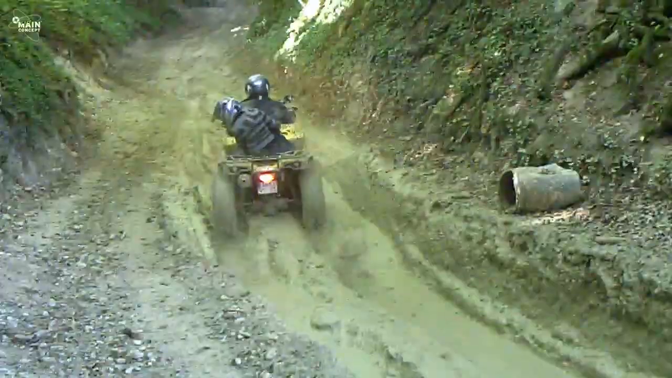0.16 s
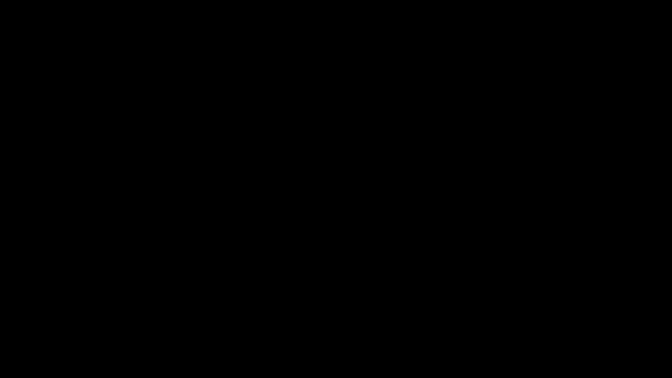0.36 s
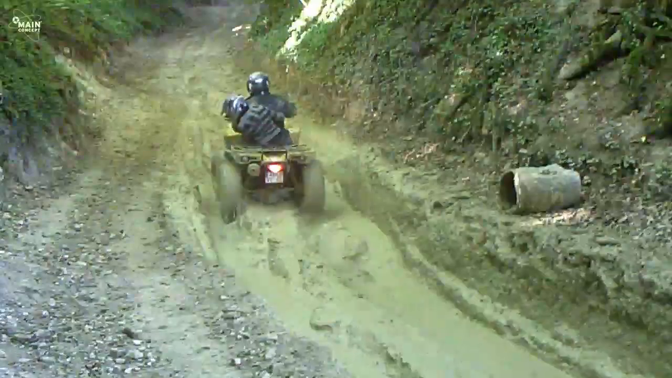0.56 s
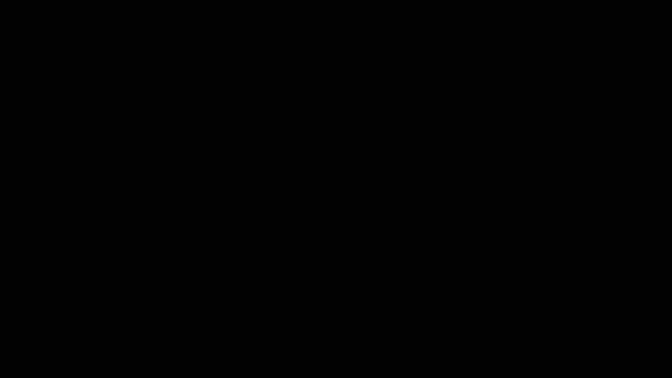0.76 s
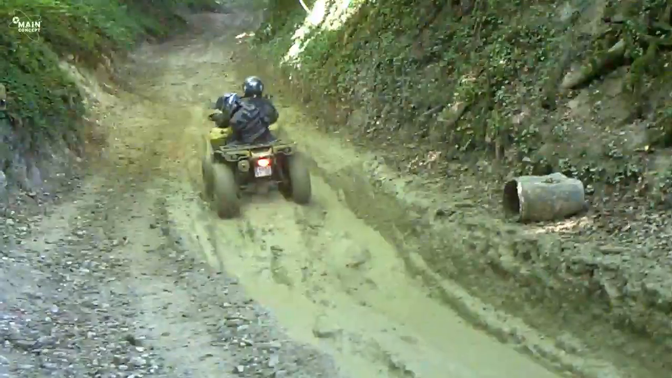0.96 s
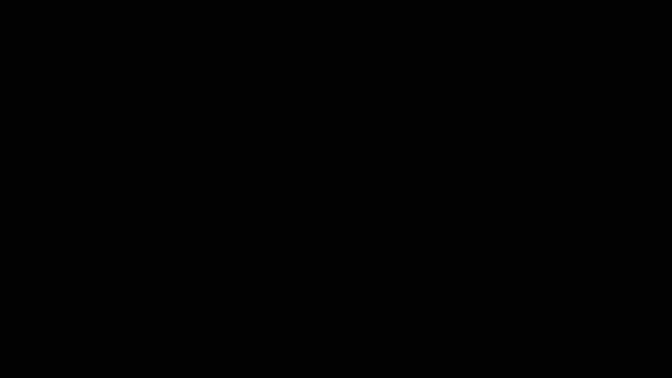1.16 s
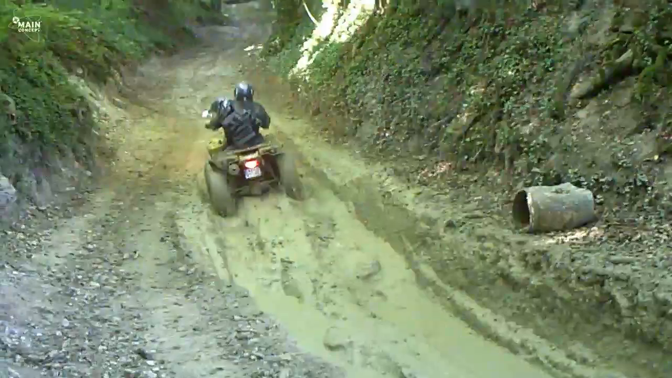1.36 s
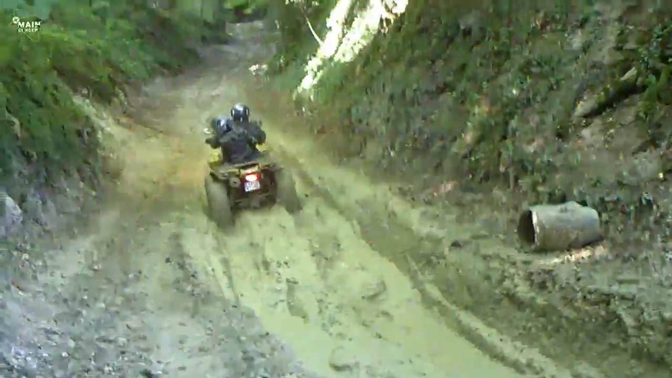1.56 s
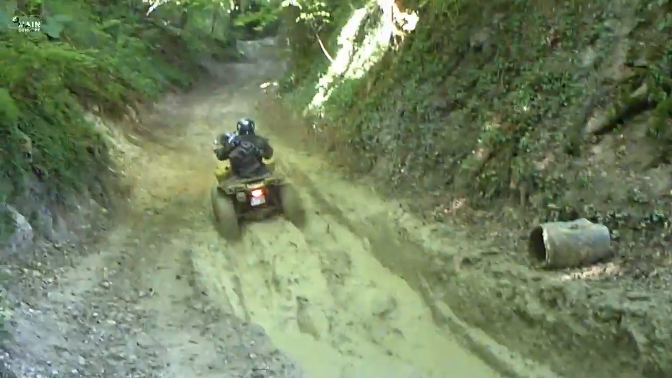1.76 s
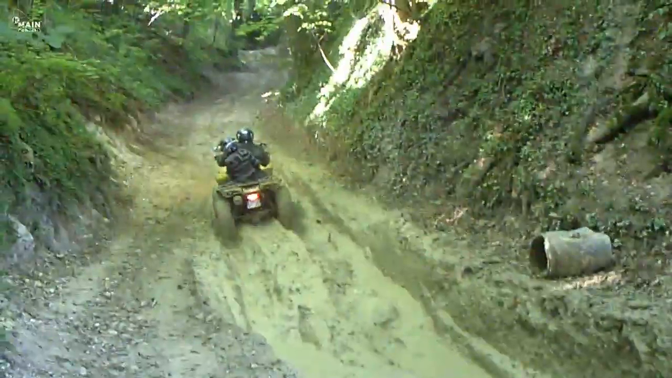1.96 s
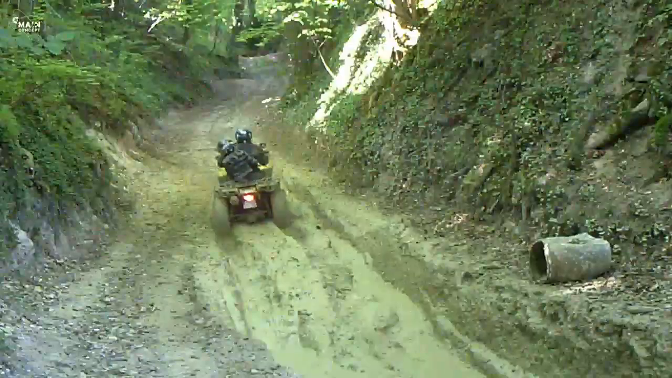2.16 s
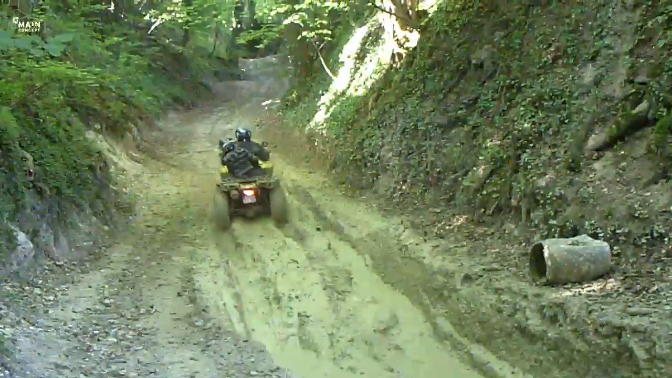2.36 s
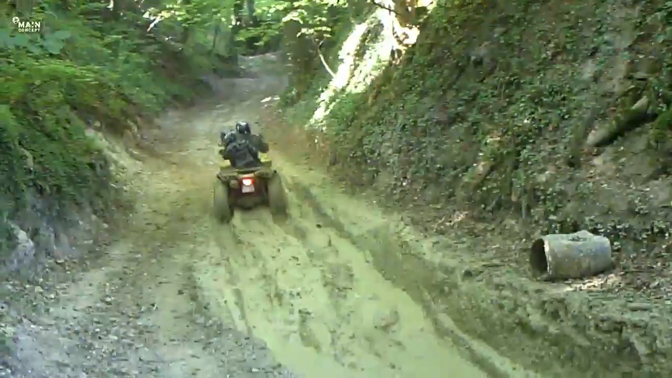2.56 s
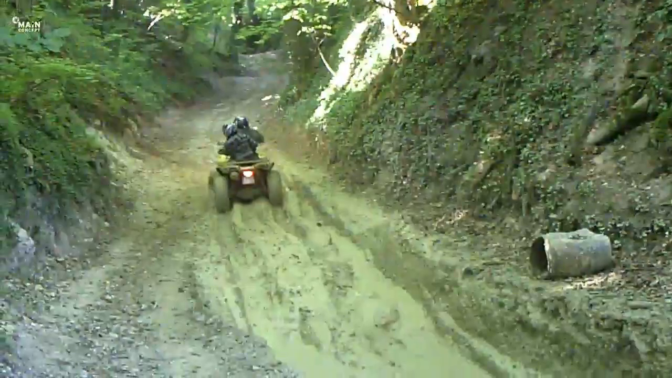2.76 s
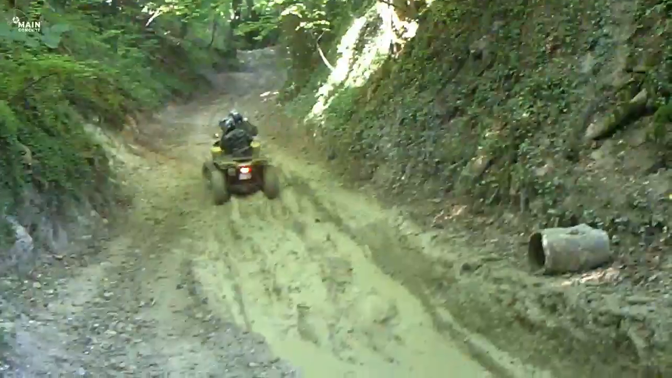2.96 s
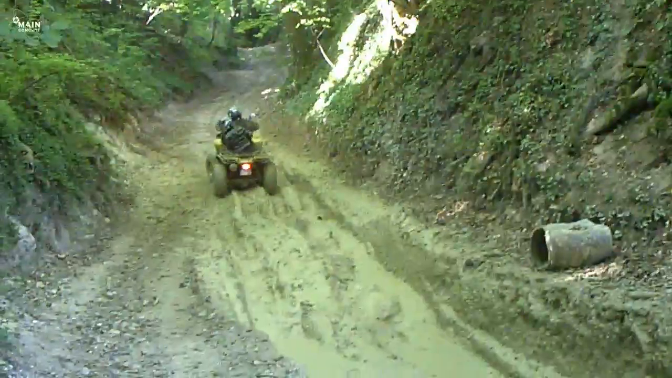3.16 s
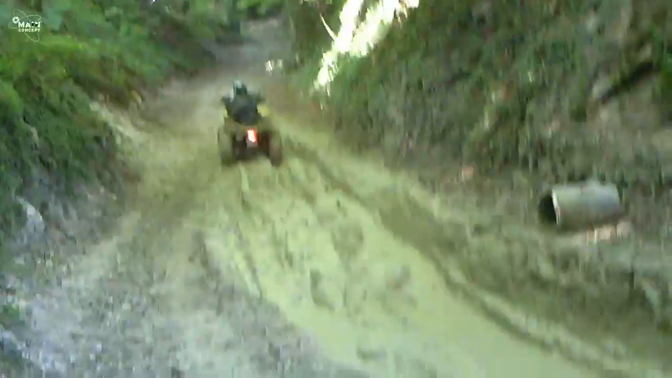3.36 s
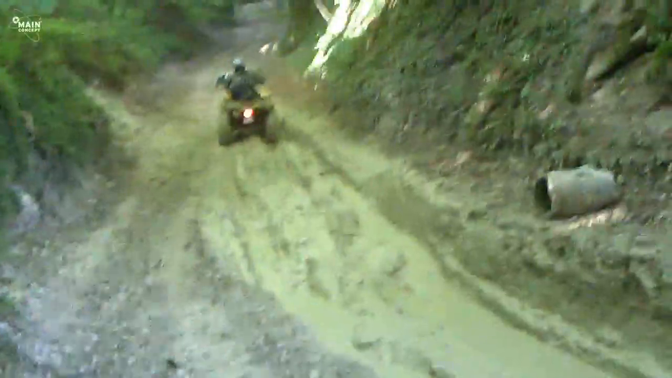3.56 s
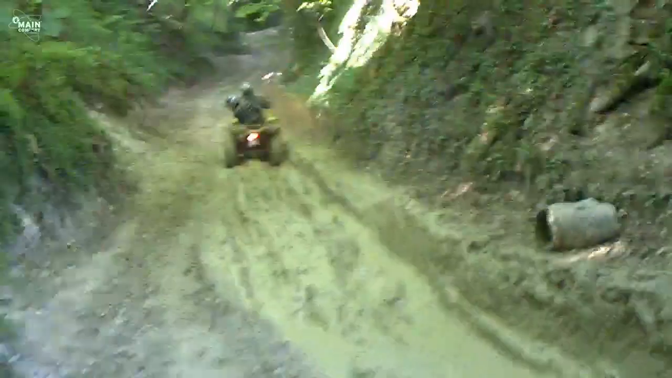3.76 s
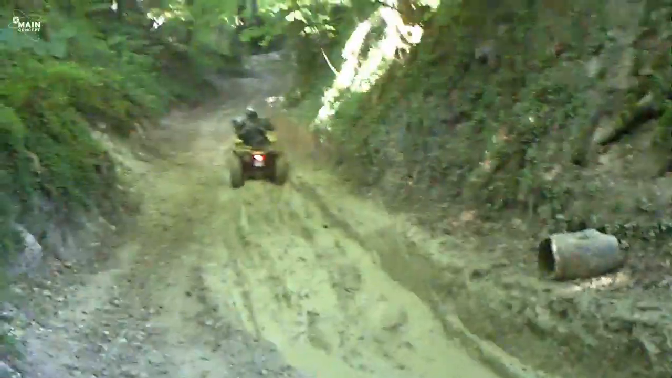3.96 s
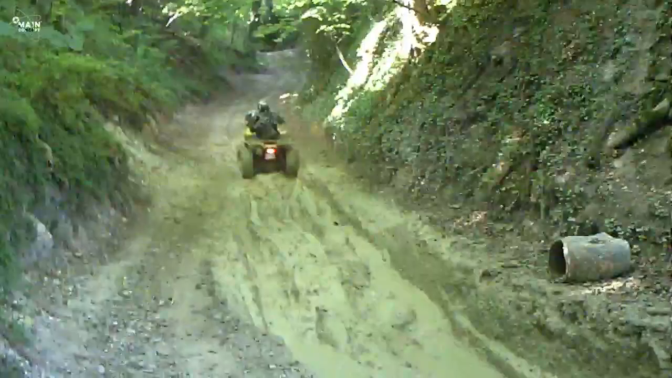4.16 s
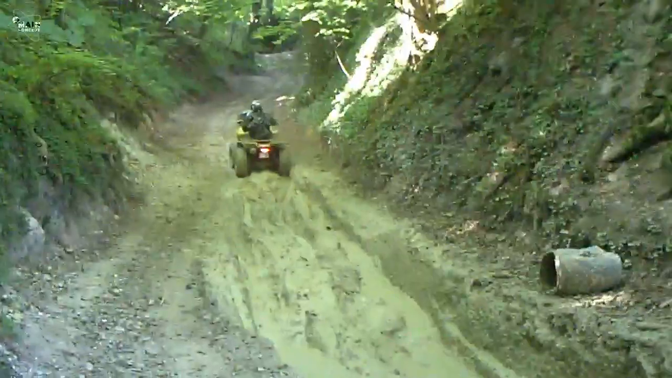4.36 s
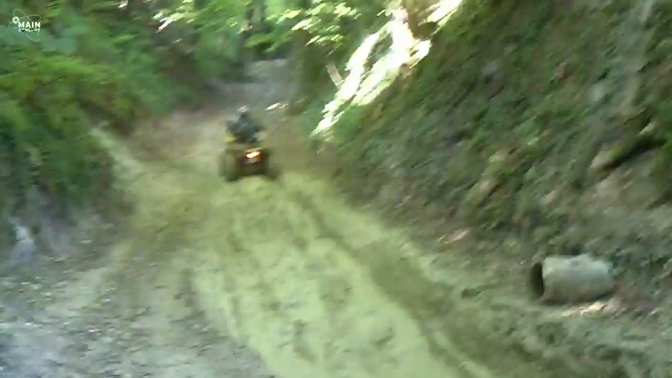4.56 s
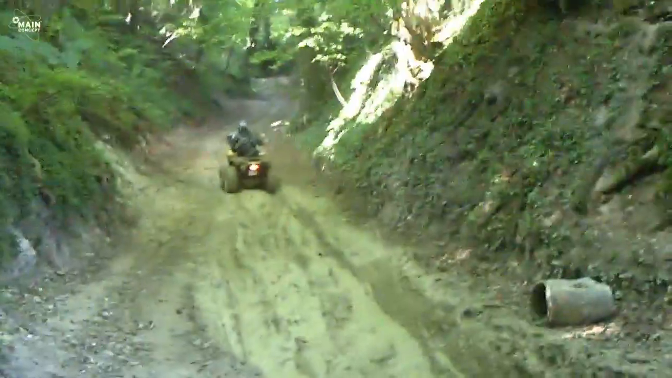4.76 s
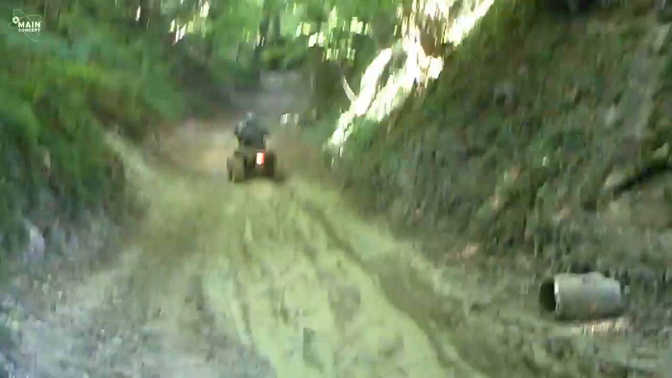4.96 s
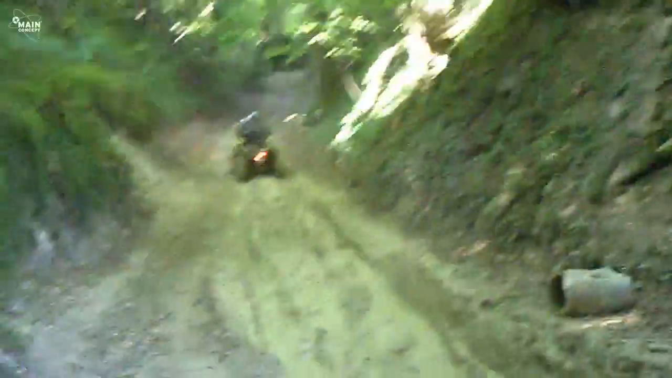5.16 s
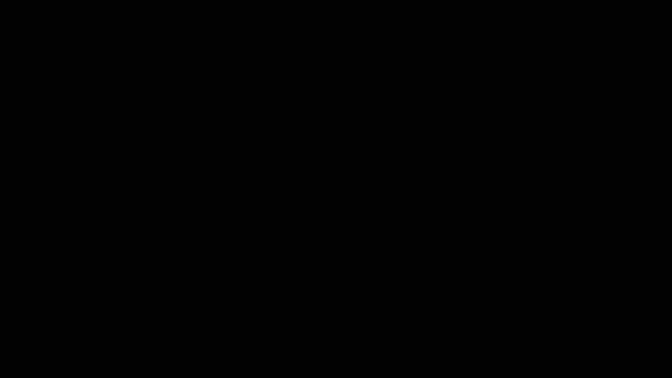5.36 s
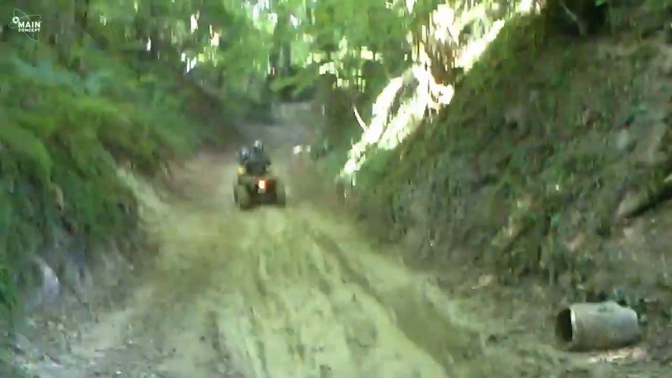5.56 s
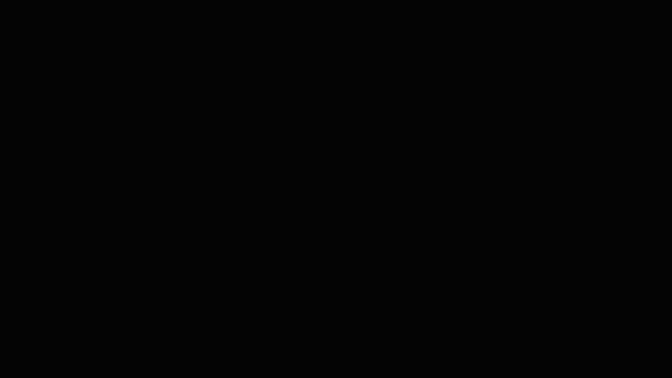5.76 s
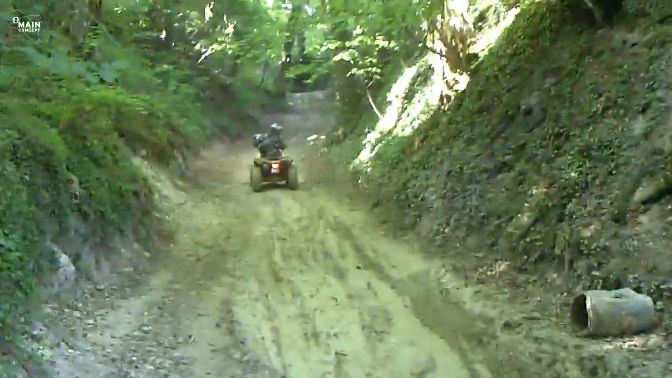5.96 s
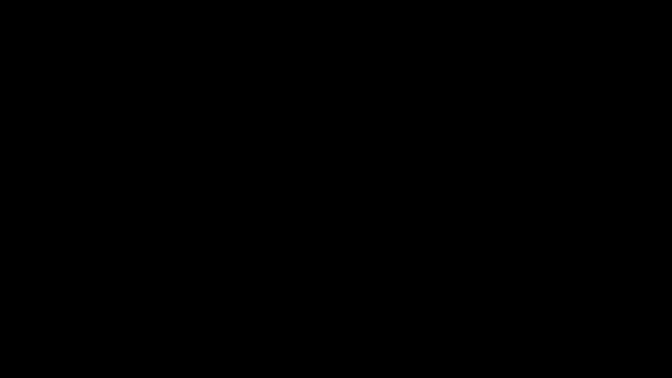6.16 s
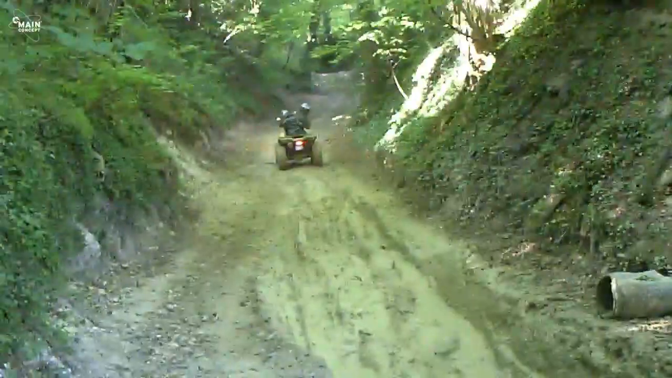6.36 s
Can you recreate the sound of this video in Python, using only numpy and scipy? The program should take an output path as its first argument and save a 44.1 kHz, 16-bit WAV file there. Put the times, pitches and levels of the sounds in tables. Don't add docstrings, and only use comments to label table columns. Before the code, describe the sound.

At 0 s a short wash of puddle water and tyre rumble dies quickly under a quad bike's raspy single-cylinder engine. Its fast revs fall to a low, heavy growl by about 0.6 s, then climb in steps to a peak near 1.8 s, with racks rattling and stones knocking, busiest from 1 to 2.4 s. Revs drop again by 2.5 s and stay low and labouring until about 3.7 s. A second surge rises around 4 to 4.4 s, with sharp grit ticks, then sinks by 4.8 s as the machine recedes. From about 5.7 s steady firing gives way to irregular, soft low thumps of idling. At 6.26 s a faint wavering belt whine rises until the end. Earth banks add short dull echoes; the small camera sounds coarse and gritty, with brief clicks and stumbles roughly every third of a second.

```python
import sys
import numpy as np
from scipy import signal
from scipy.fft import rfft, irfft
from scipy.io import wavfile
from scipy.ndimage import uniform_filter1d

SR = 44100
rng = np.random.default_rng(int(sys.argv[2]) if len(sys.argv) > 2 else 0)


def attenuation_scalar(level_db):
    decades = np.asarray(level_db, float) / 20
    return 10 ** decades


def pcm_store(signal):
    levels = np.round(np.clip(np.atleast_2d(signal), -1, 1) * 32767)
    wavfile.write(sys.argv[1], SR, levels.astype(np.int16).T)


N = 282681

# start_s, firing_rate_hz
FIRING_RATE = [(0, 35.6), (.27, 27.6), (.58, 23.6), (1.02, 28.1), (1.17, 28.8), (1.29, 32.8), (1.42, 31.6),
               (1.79, 36.4), (1.94, 34.3), (2.18, 27.3), (2.56, 25.7), (3.0, 26.9), (3.46, 23.9),
               (3.72, 24.5), (4.0, 30.1), (4.38, 31.5), (4.8, 24.9), (5.52, 23)]
# start_s, exhaust_pulse_db, gas_flow_db, chamber_load_db
EFFORT = [(0, -27.5, -38.5, -2), (.12, -25, -43.5, -2.5), (.38, -20, -43.5, 0.5), (.65, -23, -46.5, -4),
          (.85, -19.5, -43.5, 0), (1.2, -23, -45, 1), (1.45, -23, -43, 3.5), (1.8, -33, -41, 3),
          (2.1, -34.5, -45, 4), (2.3, -26.5, -46.5, 4.5), (3.2, -28, -48.5, 3), (3.5, -26, -50.5, -0.5),
          (3.78, -23, -49.5, 3), (4.35, -31, -50, -0.5), (4.95, -28, -54.5, -3), (5.45, -30.5, -54, -2),
          (5.68, -31, -60, -5.5), (6.41, -42, -64, 0)]
# multiple_of_firing_rate, level_db
CYCLE_HARMONICS = [(1, 10), (2, 11.5), (3, 14), (4, -2.5), (5, 7), (6, 4.5), (7, -11), (8, 1.5), (9, -7),
                   (10, 7), (11, 9.5), (12, 6), (13, 10), (14, 0.5), (15, 5.5), (16, 5), (17, -10),
                   (18, -1.5), (19, -1.5), (20, 3.5), (21, 6), (22, 10.5), (23, -20), (24, -11.5)]
# (pitch_hz, width_hz, level_db)
CHAMBER_MODES = [
    (0.11, [(30.2, 13, -14.5), (61.8, 49.7, -0.5), (93.7, 38.6, -1.5)]),
    (-0.035, [(125.8, 35.7, 0)]),
    (0.96, [(206.6, 32, 0)]),
    (-0.0082, [(378, 54.7, 0)]),
    (-1.3, [(249.4, 15, 6), (290.1, 52, 11.5)]),
    (1, [(494.7, 35.7, 5.5), (576, 39, -9.5)]),
]
# level_over_pulse_db, pulse_swing_share, slope_db_per_hz,
# distance_loss_share, load_share
CHAMBER_RESPONSE = [(-9, 0.26, 1.35, 0.57, -0.25), (-0.5, 0.93, -0.18, 0.56, -0.2),
                    (-7, 0.97, 1.35, 0.0035, 1.47), (-11, 0.2, 0.47, -0.15, -0.39),
                    (-13, 0.12, 0.67, 0.16, 0.43), (-20.5, 0.93, 0.5, 0.21, -1.44)]
# multiple_of_firing_rate, level_db, slope_db_per_hz, distance_loss_share
PIPE_HARMONICS = [(5, -33.5, 1.16, 0.33), (8, -34, 0.37, 0.25), (3, -40.5, -0.5, .2), (13, -46, 1.6, 0.22),
                  (6, -40, -0.9, .2)]
# pitch_hz, level_db_per_hz
HISS_SPECTRUM = [(1150, -14.5), (1400, -3), (1750, -2), (2050, -8.5), (2330, 2.5), (2500, -15),
                 (2700, -15.5), (3000, -8), (3400, -13.5), (3700, -10), (4000, -6.5), (4600, -17.5),
                 (5100, -1.5), (5900, -21)]
# pitch_hz, level_db, t60_s
RACK_MODES = [(904, -2, 0.012), (1000, -2, 0.011), (1280, -5.5, 0.0044), (1855, -8.5, 0.0098),
              (2360, -12, 0.015)]
# start_s, level_db, pitch_hz
KNOCK_EVENTS = [(0.05, -23, 1000), (0.092, -38, 855), (0.25, -35, 940), (0.365, -33, 900),
                (0.404, -27, 991), (0.609, -34, 977), (0.851, -27, 934), (0.961, -25.5, 1040),
                (1.098, -24, 1000), (1.175, -27, 895), (1.362, -26, 820), (1.461, -20.5, 970),
                (1.493, -22, 990), (1.668, -23, 1040), (1.944, -25.5, 994), (2.029, -19.5, 1070),
                (2.132, -24.5, 930), (2.296, -24.5, 746), (2.404, -18, 1040), (2.759, -31, 853),
                (3.042, -33, 930), (3.148, -29, 990), (3.265, -25.5, 1040), (3.815, -25, 1000),
                (3.962, -32, 830), (4.138, -23, 800), (4.424, -31.5, 700), (4.619, -45, 895),
                (4.868, -36, 735), (5.156, -41, 1000)]
# start_s, level_db
IDLE_FIRINGS = [(5.666, -28), (5.773, -25), (5.805, -23), (5.847, -28), (5.901, -27.5), (5.95, -24.5),
                (6.051, -31), (6.109, -33), (6.133, -27), (6.192, -28.5), (6.25, -28.5), (6.282, -27),
                (6.335, -31), (6.381, -27)]
# start_s, level_db
TICK_EVENTS = [(0.4685, -33), (0.6, -40.5), (0.6909, -46), (0.7705, -36.5), (0.9718, -42), (1.1404, -47),
               (1.2074, -39), (2.2316, -47), (2.5283, -42), (2.7227, -42), (2.8146, -40), (3.307, -42),
               (3.6696, -46), (3.8123, -30), (3.9251, -39), (4.0936, -43), (4.2967, -35), (4.3716, -46),
               (4.4895, -40), (4.8096, -47), (5.0336, -54.5), (5.116, -35), (5.2192, -37), (5.3555, -39)]
# start_s, pitch_hz, level_db
BELT_WHINE = [
    (6.26, 860, -60),
    (6.29, 905, -56),
    (6.33, 960, -55),
    (6.37, 1000, -55),
    (6.41, 1040, -54),
]
# pitch_hz, level_db_per_hz
RUMBLE_SPECTRUM = [(18, -2), (30, -4.5), (60, -2), (110, -3), (190, -8.5), (250, -15), (400, -15),
                   (600, -22.5), (900, -28)]
# start_s, level_db
STRAY_SAMPLES = [
    (0.2314, -27),
    (0.601, -38),
    (0.9702, -30.5),
    (1.718, -34.5),
    (2.816, -48),
    (3.925, -40),
    (4.2946, -33.5),
    (5.0335, -38),
    (5.7718, -60),
]

MID_RATE_HZ = 28
SHUT_S = 5.7


def rms_one(x):
    return x / np.sqrt(np.mean(x ** 2) + 1e-20)


def in_time(rows):
    s, *columns = np.transpose(rows)
    return [np.interp(np.arange(N) / SR, s, column) for column in columns]


def evened(x, window_s, share):
    x = rms_one(x)
    power = uniform_filter1d(x ** 2, int(window_s * SR)) + 1e-12
    return x / power ** (np.clip(share, 0, 1) / 2)


def drift(rate_hz):
    r = np.exp(-80 * np.pi * rate_hz / SR)
    white = rng.standard_normal(N // 40 + 2002)
    slow = signal.lfilter([1], [1, -2 * r, r * r], white)[2000:]
    return np.interp(np.arange(N) / 40, np.arange(len(slow)), rms_one(slow))


def resonate(x, hz, width_hz):
    r = np.exp(-np.pi * width_hz / SR)
    poles = [1, -2 * r * np.cos(2 * np.pi * hz / SR), r * r]
    return signal.lfilter([(1 - r * r) / 2, 0, (r * r - 1) / 2], poles, x)


def ring(clicks, hz, t60_s):
    r = attenuation_scalar(-60 / (t60_s * SR))
    w = 2 * np.pi * hz / SR
    return signal.lfilter([0, np.sin(w)], [1, -2 * r * np.cos(w), r * r], clicks + 1e-18)


def coloured(spectrum, patchy_db):
    hz_at, db_at = np.transpose(spectrum)
    edges = np.geomspace(hz_at[0], hz_at[-1], int(6 * np.log2(hz_at[-1] / hz_at[0])))
    white = rng.standard_normal((2, N))
    out = 0
    for k, (low, high) in enumerate(zip(edges, edges[1:])):
        bandpass = signal.butter(2, [low, high], "band", fs=SR, output="sos")
        band = signal.sosfilt(bandpass, white[k % 2])
        band_db = np.interp(np.log(low * high) / 2, np.log(hz_at), db_at)
        out = out + band * attenuation_scalar(band_db + patchy_db * drift(10.3))
    return rms_one(out)


def sudden(harmonic_db):
    suddenness = 0.25
    tail_db = harmonic_db[-1] - np.arange(1, 9) * 3
    cepstrum = irfft(np.log(attenuation_scalar(np.r_[harmonic_db[0], harmonic_db, tail_db])))
    half = len(cepstrum) // 2
    cepstrum[1:half] *= 2
    cepstrum[half + 1:] = 0
    return suddenness * rfft(cepstrum).imag[1:len(harmonic_db) + 1]


def exhaust(turns, levels_db, rough):
    turns = turns + 0.043 * rough * drift(24)
    lags = sudden(np.array(CYCLE_HARMONICS)[:, 1])
    pulses = 0
    for (k, db), lag in zip(CYCLE_HARMONICS, lags):
        pulses = pulses + attenuation_scalar(db) * np.cos(2 * np.pi * k * turns + lag)
    strength_db = 3.9 * rough * rng.standard_normal(400)[turns.astype(int).clip(0)]
    pulses = pulses * attenuation_scalar(uniform_filter1d(strength_db, size=300))
    out = 0
    for (share_db, modes), db in zip(CHAMBER_MODES, levels_db):
        voice = 0
        for hz, width_hz, mode_db in modes:
            once = resonate(pulses, hz, 0.89 * width_hz)
            voice = voice + attenuation_scalar(mode_db) * resonate(once, hz, 0.89 * width_hz)
        out = out + attenuation_scalar(db + share_db) * evened(voice, window_s=.17, share=0.63)
    return out * np.clip((SHUT_S - np.arange(N) / SR) / 0.28, 0, 1)


def straight_pipe(turns, rate_hz, far_swing_db):
    clears_hz, chokes_hz, edge_hz = 27.8, 31.9, .3
    cleared = 1 / (1 + np.exp((clears_hz - rate_hz) / edge_hz))
    unchoked = 1 / (1 + np.exp((rate_hz - chokes_hz) / edge_hz))
    out = 0
    for k, db, slope, far in PIPE_HARMONICS:
        level_db = db + slope * (rate_hz - MID_RATE_HZ) + far * far_swing_db
        out = out + attenuation_scalar(level_db) * np.cos(2 * np.pi * int(k) * turns)
    return cleared * unchoked * out


def gas_hiss(turns, hiss_db):
    puff = attenuation_scalar(np.cos(2 * np.pi * (turns - .15)) + 1.01 * drift(63))
    return attenuation_scalar(hiss_db) * rms_one(coloured(HISS_SPECTRUM, patchy_db=-1.5) * puff)


def blows(events, cycles, rise_cycles, partner, gain_db):
    out = np.zeros(N + SR)
    for s, db, hz in events:
        t = np.arange(int(3 * cycles / hz * SR)) / SR * hz
        shape = (1 - np.exp(-t / rise_cycles)) * np.exp(-3 * t / cycles)
        wave = np.sin(2 * np.pi * t) + 0.36 * np.sin(2 * np.pi * partner * t)
        start = int(s * SR)
        out[start:start + len(t)] += attenuation_scalar(db + gain_db) * shape * wave
    return out[:N]


def idle():
    firings = [(s, db, 110.4) for s, db in IDLE_FIRINGS]
    return blows(firings, cycles=3.26, rise_cycles=0.86, partner=0.71, gain_db=7.5)


def belt():
    hz, db = in_time(BELT_WHINE)
    onset = np.clip((np.arange(N) / SR - BELT_WHINE[0][0]) / 0.033, 0, 1)
    level = attenuation_scalar(db + 3 + 2.5 * drift(30))
    phase = 2 * np.pi * np.cumsum(hz * (1 + .012 * drift(40))) / SR
    return onset * level * np.sin(phase)


def rattle(turns, rattle_db):
    sizes = attenuation_scalar(3.94 * np.minimum(rng.exponential(1, N), 5)) * rng.choice([-1, 1], N)
    clicks_per_s = 650 * attenuation_scalar(6.0 * np.cos(2 * np.pi * (turns - .15)))
    clicks = sizes * (rng.random(N) < clicks_per_s / SR)
    struck = rng.integers(0, len(RACK_MODES), N)
    rings = 0
    for k, (hz, db, t60_s) in enumerate(RACK_MODES):
        rings = rings + attenuation_scalar(db) * ring(clicks * (struck == k), hz, t60_s)
    wash = coloured([(520, 2), (750, 4), (1000, 6), (1400, -4)], patchy_db=1.5)
    return attenuation_scalar(rattle_db - 4.5) * (rms_one(rings) + attenuation_scalar(-1.5) * wash)


def knocks():
    return blows(KNOCK_EVENTS, cycles=7.1, rise_cycles=0.19, partner=1.7, gain_db=1.5)


def thin_ticks():
    ticks = [(s, db, 3300) for s, db in TICK_EVENTS]
    return blows(ticks, cycles=2.5, rise_cycles=0.18, partner=1.6, gain_db=8.5)


def wheels(gas_swing_db):
    t = np.arange(N) / SR
    puddle_db = 21 * np.exp(-t / 0.058)
    level = attenuation_scalar(-37 + 0.31 * gas_swing_db + puddle_db)
    return level * coloured(RUMBLE_SPECTRUM, patchy_db=2.0)


def banks(x):
    dull = signal.lfilter([.2], [1, -.8], x)
    out = x
    for delay_s, db in [(.011, -7.5), (.027, -14), (.052, -29.5)]:
        out = out + attenuation_scalar(db) * np.concatenate([np.zeros(int(delay_s * SR)), dull])[:N]
    return out


def scene():
    t = np.arange(N) / SR
    sag_hz = 14 * np.clip(t - FIRING_RATE[-1][0], 0, .3)
    rate_hz = uniform_filter1d(in_time(FIRING_RATE)[0] - sag_hz, size=2600)
    faster_hz = rate_hz - MID_RATE_HZ
    turns = np.cumsum(rate_hz) / SR
    accel_hz_per_s = uniform_filter1d(abs(np.gradient(rate_hz) * SR), size=4400)
    rough = .025 + .006 * accel_hz_per_s

    pulse_db, gas_db, load_db = in_time(EFFORT)
    pulse_swing_db = pulse_db - pulse_db.mean()
    gas_swing_db = gas_db - gas_db.mean()
    start_m, away_m_per_s = 6, 1.6
    far_db = -20 * np.log10(1 + away_m_per_s * t / start_m)
    far_swing_db = far_db - far_db.mean()
    levels_db = []
    for db, swing, slope, far, load in CHAMBER_RESPONSE:
        level_db = pulse_db.mean() + db + swing * pulse_swing_db + slope * faster_hz
        levels_db.append(level_db + far * far_swing_db + load * load_db)
    rattle_db = gas_db.mean() + 6 + 1.24 * gas_swing_db + 0.23 * faster_hz

    engine = exhaust(turns, levels_db, rough) + straight_pipe(turns, rate_hz, far_swing_db)
    engine = engine + gas_hiss(turns, gas_db) + rattle(turns, rattle_db)
    hits = idle() + knocks() + thin_ticks()
    return (engine + banks(hits) + belt() + wheels(gas_swing_db))[None]


def roll_off(x):
    return signal.sosfilt(signal.butter(12, 15500, fs=SR, output="sos"), x)


def record(dry):
    sampling_hz, seam_first_s, seam_every_s = 11025, .2331, .36935
    step = SR // sampling_hz
    antialias = signal.cheby2(10, 50, 6600, fs=SR, output="sos")
    coarse = signal.sosfilt(antialias, dry[0])[::step]
    seams = (np.arange(seam_first_s, N / SR, seam_every_s) * sampling_hz).astype(int)
    for at in seams:
        coarse[at:at + 5] = coarse[at]
    for s, db in STRAY_SAMPLES:
        nearest = seams[np.argmin(abs(seams - s * sampling_hz))]
        coarse[nearest - 1] -= attenuation_scalar(db + 13.0)
    joined = np.interp(np.arange(N) / step, np.arange(len(coarse)), coarse)
    rolloff = signal.butter(2, 11500, fs=SR, output="sos")
    mix = signal.sosfilt(rolloff, joined)[None]
    return roll_off(mix)


dry = scene()
out = record(dry)
pcm_store(out)
```